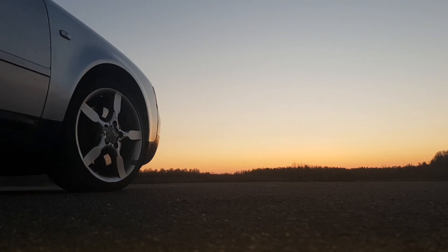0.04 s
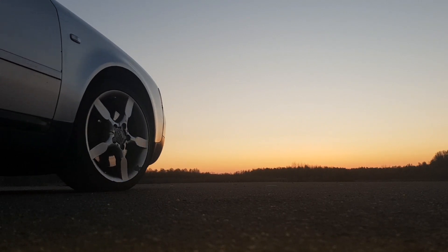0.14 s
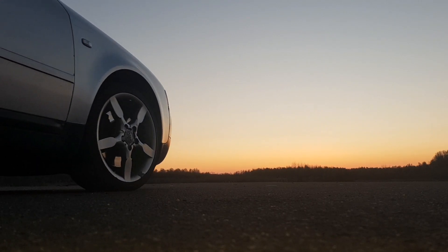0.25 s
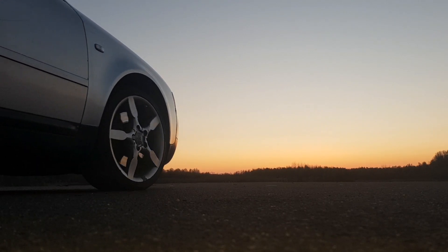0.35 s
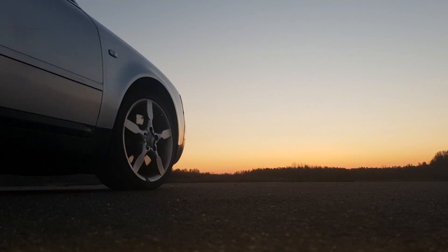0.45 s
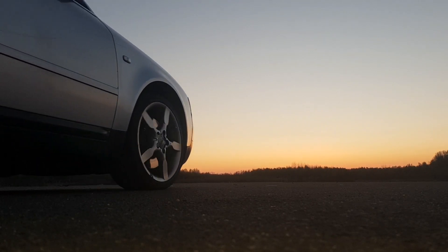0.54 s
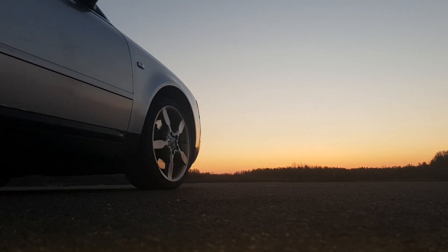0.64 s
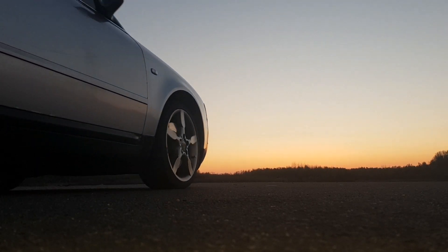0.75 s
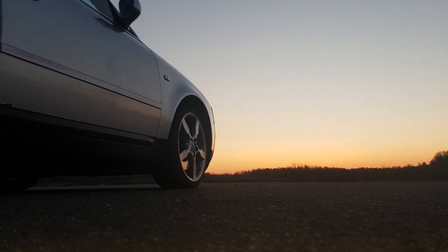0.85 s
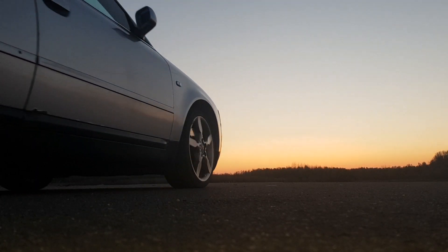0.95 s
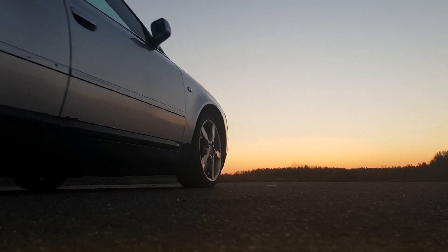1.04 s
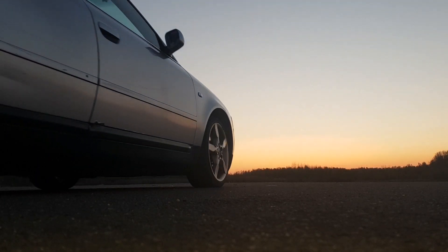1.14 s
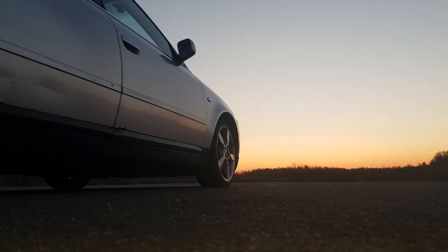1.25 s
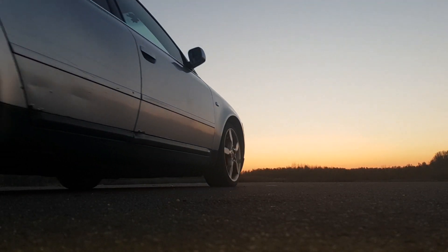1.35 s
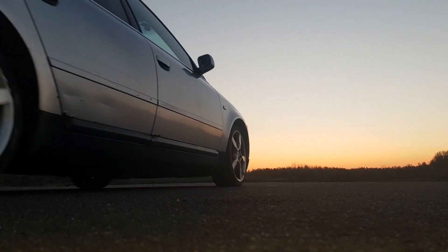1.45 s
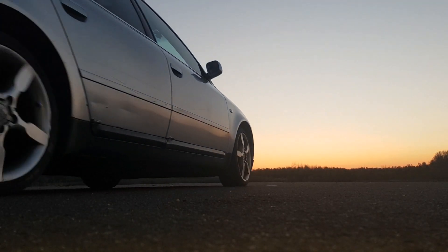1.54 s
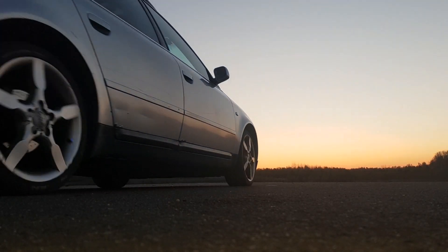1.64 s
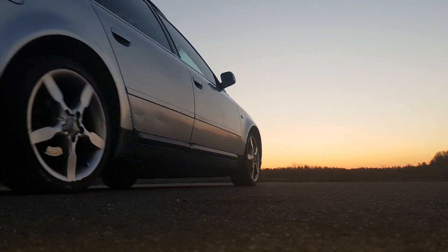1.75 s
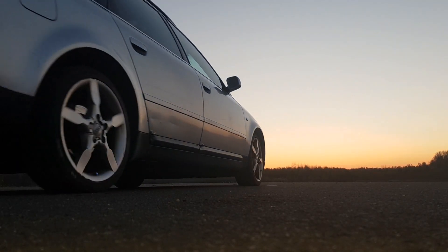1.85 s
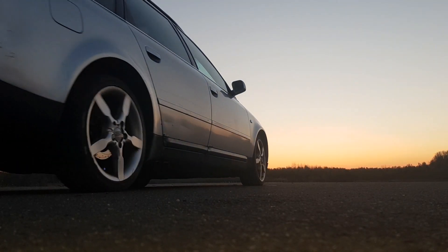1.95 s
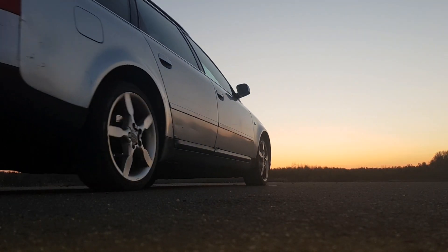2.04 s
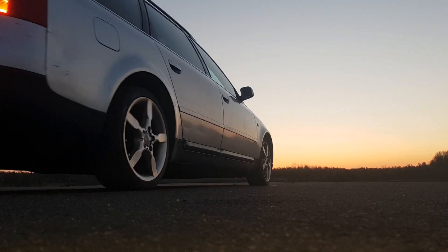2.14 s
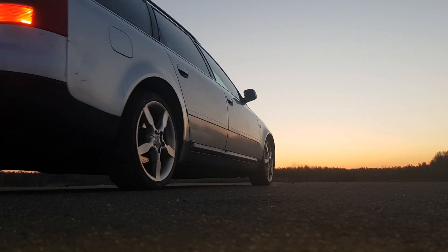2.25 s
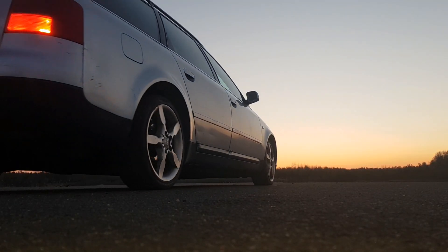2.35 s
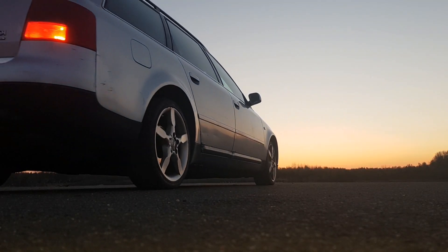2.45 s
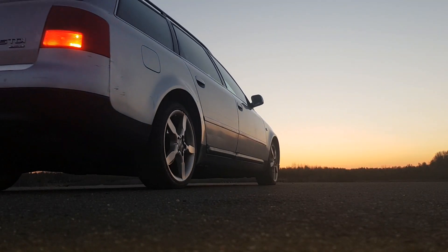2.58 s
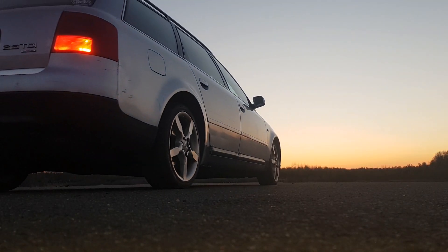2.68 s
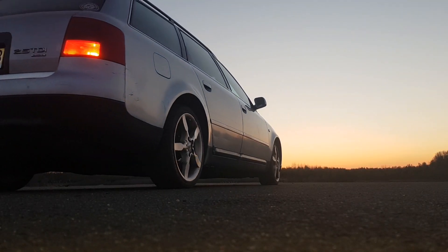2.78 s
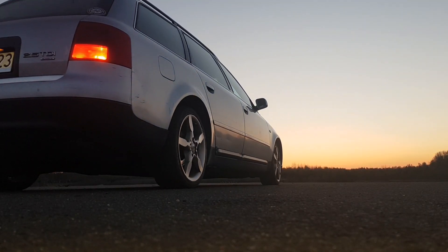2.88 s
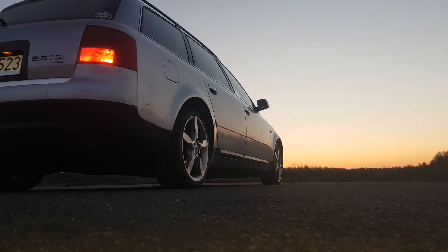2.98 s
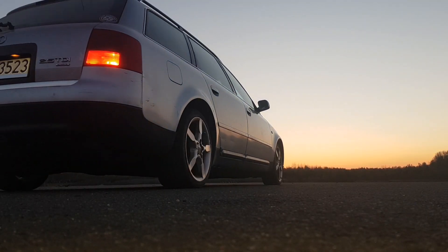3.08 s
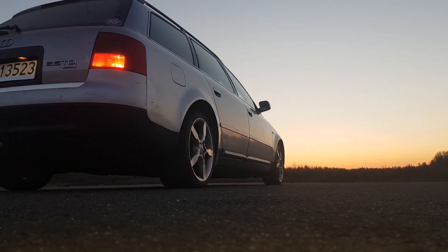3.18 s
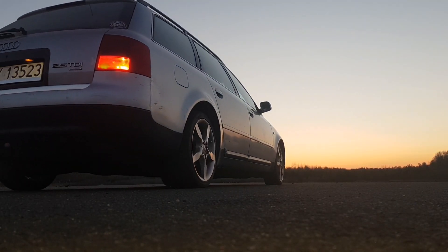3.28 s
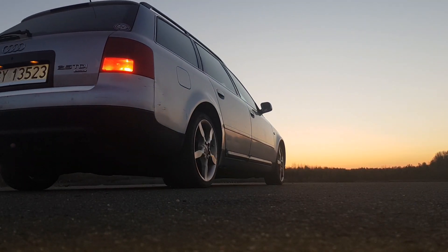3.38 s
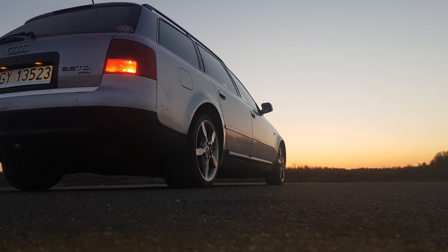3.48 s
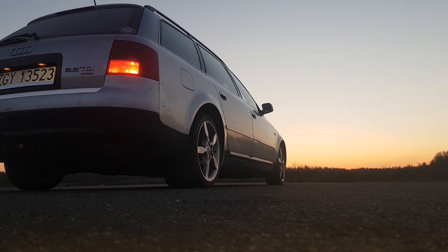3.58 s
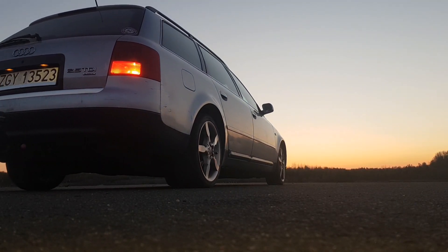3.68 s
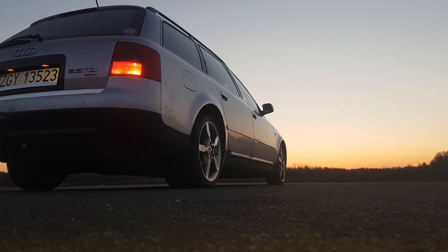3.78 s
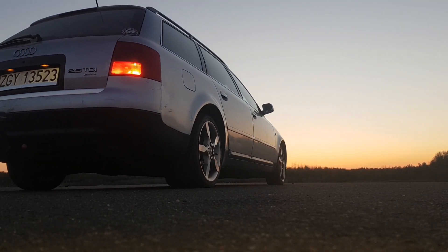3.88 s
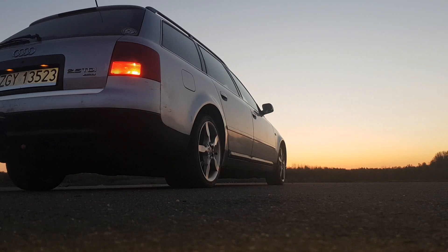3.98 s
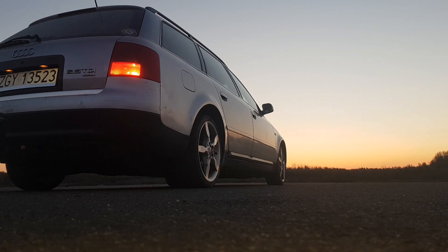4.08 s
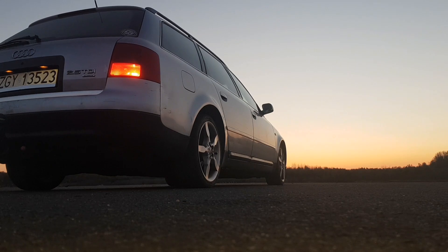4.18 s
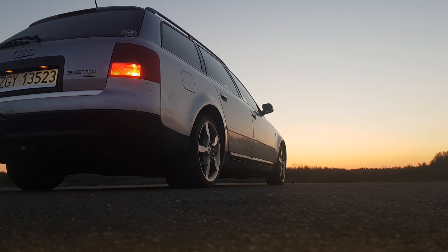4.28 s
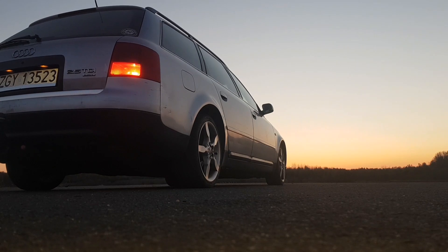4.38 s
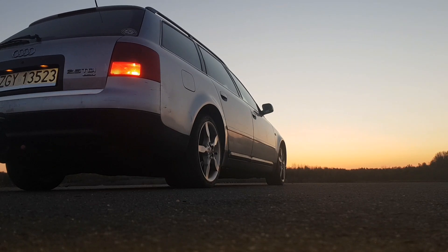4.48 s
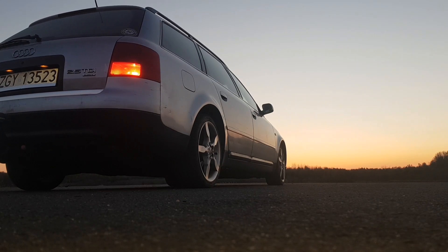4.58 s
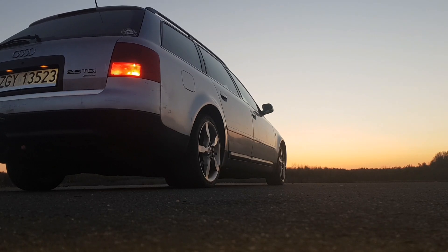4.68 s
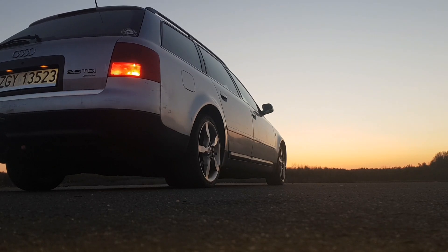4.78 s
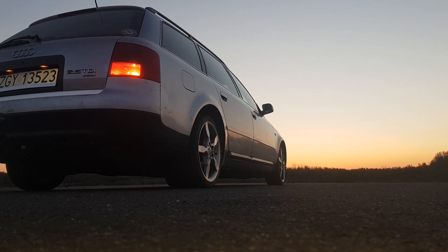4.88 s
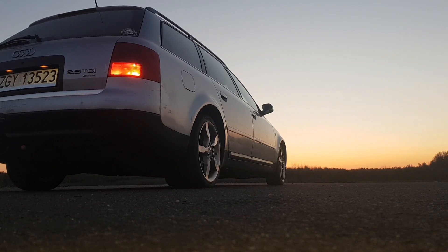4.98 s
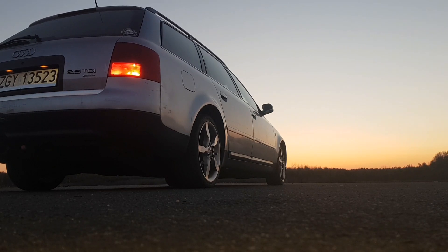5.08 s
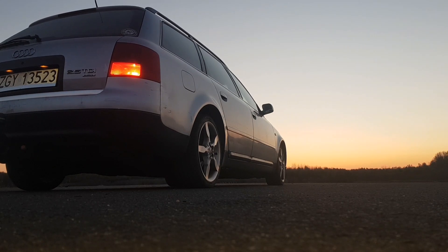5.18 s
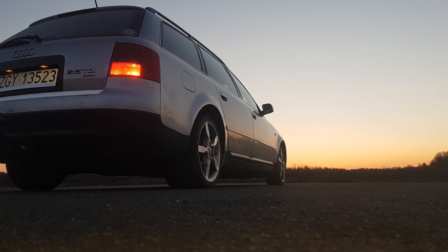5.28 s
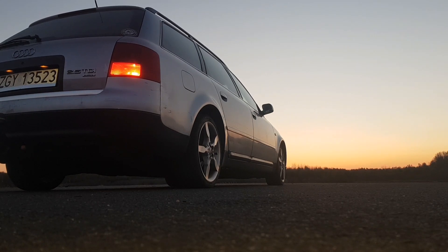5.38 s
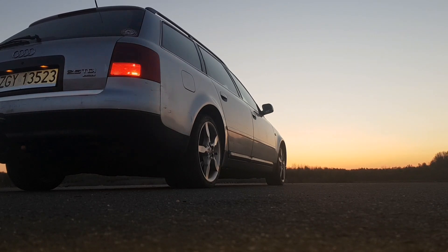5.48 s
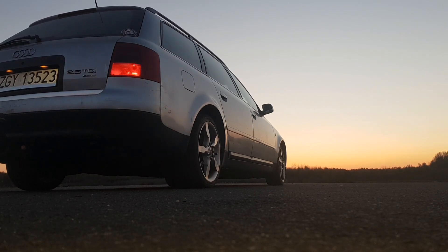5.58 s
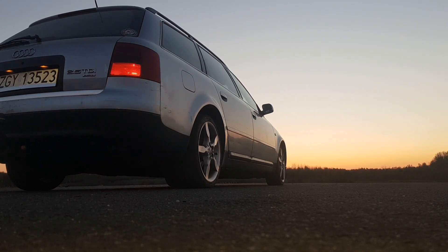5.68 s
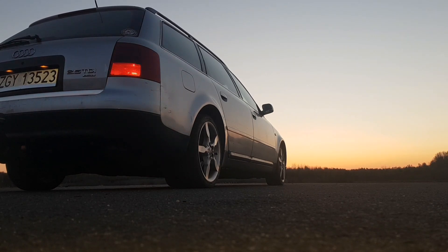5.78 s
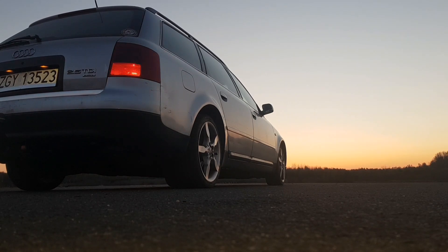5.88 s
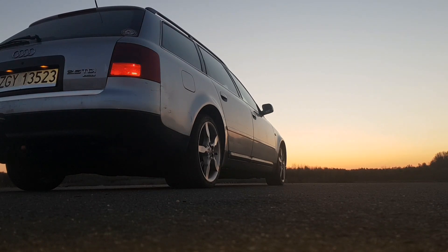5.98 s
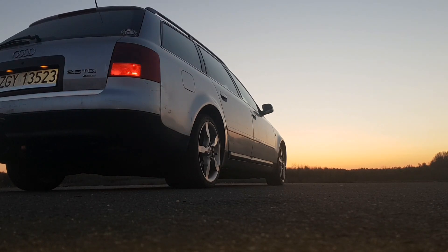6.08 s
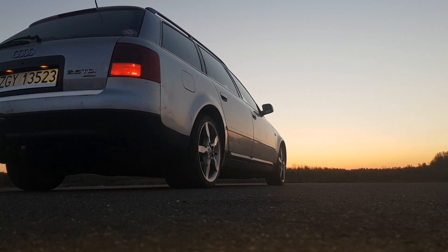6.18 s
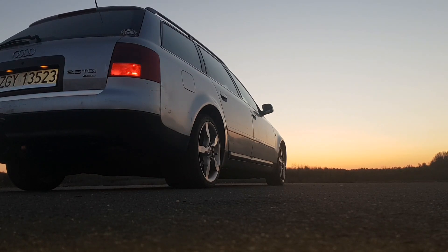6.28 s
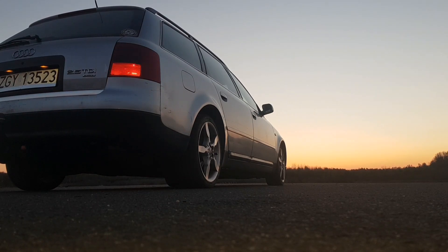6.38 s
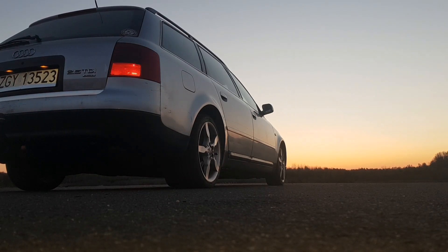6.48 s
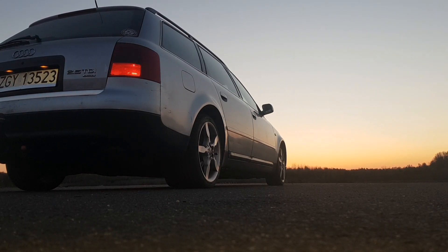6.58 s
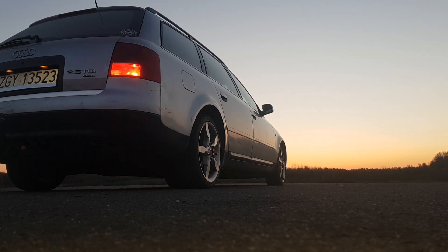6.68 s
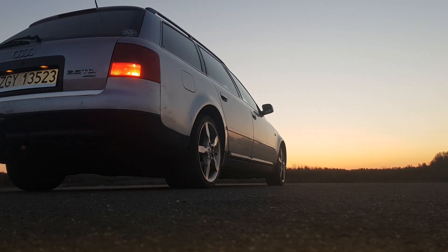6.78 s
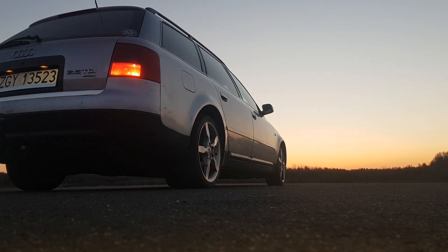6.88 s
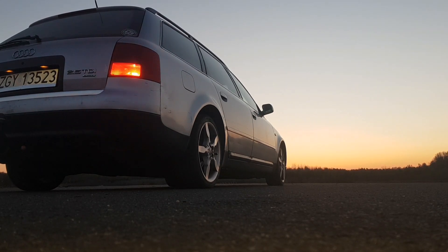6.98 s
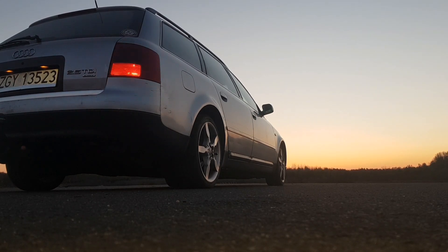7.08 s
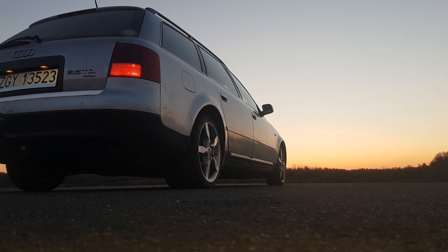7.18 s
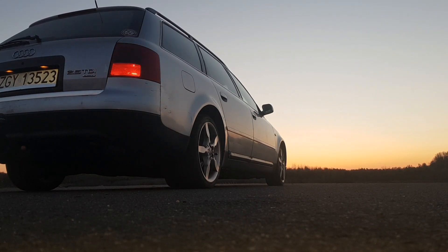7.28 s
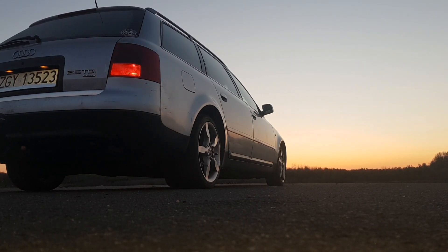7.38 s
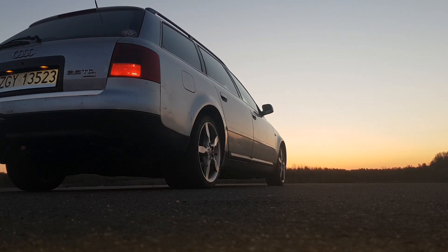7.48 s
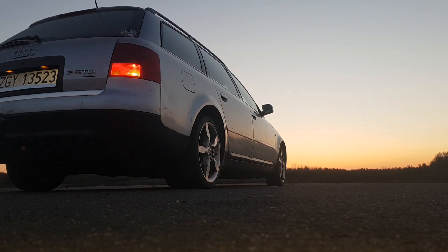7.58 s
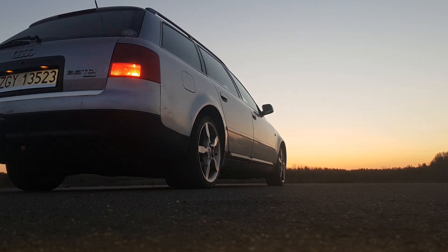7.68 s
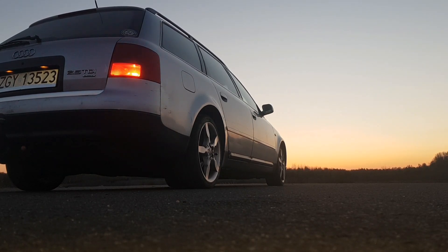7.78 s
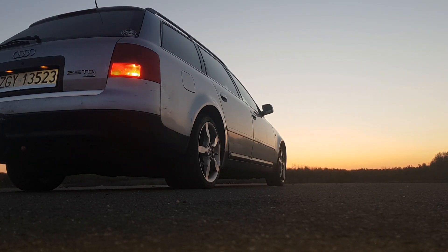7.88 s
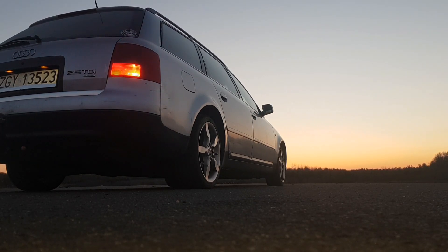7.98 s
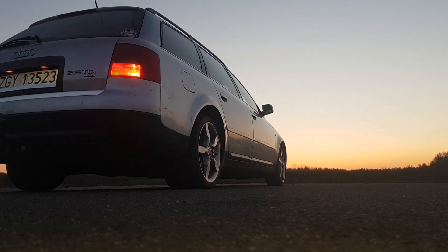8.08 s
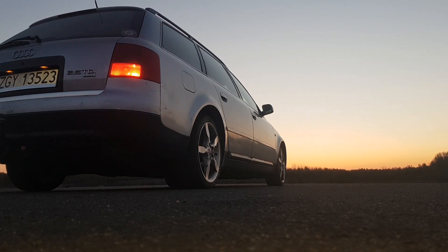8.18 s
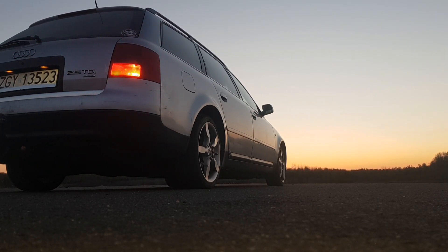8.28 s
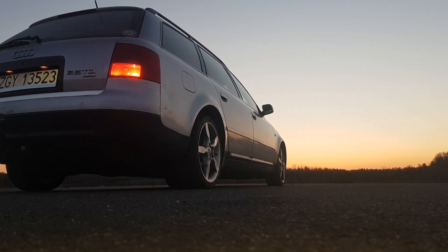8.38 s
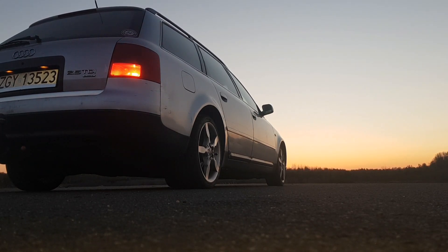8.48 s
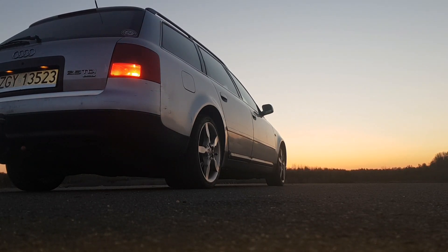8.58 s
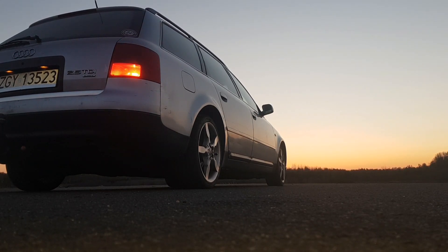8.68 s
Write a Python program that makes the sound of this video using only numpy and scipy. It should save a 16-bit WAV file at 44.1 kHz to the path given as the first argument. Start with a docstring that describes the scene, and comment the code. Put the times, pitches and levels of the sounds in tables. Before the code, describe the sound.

A diesel engine is heard outdoors in stereo from a walking position. Held revs growl near the front wheel, with brief tinny buzzes, then fall within about half a second to idle. Uneven low exhaust pulses, ticking injectors and irregular hard metallic knocks continue steadily behind the car. The idle hesitates slightly midway, and in the last moments the engine picks up again.

```python
"""Open asphalt, beside a six-cylinder diesel car: held revs, a drop to a lumpy idle, then a new rev.
Uneven firing pulses boom through pipe resonances, with a turbulent puff of noise at the tailpipe.
From the engine bay come crank-timed taps and noise bursts ringing metal, and whining tones.
A pair of hand-held microphones is walked from the front wheel to the tail; levels and arrival times follow."""
import sys
import numpy as np
from scipy import signal
from scipy.fft import rfft, irfft
from scipy.io import wavfile
from scipy.ndimage import uniform_filter1d, map_coordinates

SR = 44100
rng = np.random.default_rng(int(sys.argv[2]) if len(sys.argv) > 2 else 0)


def pcm_store(signal):
    """Save signal as 16-bit PCM."""
    levels = np.round(np.clip(np.atleast_2d(signal), -1, 1) * 32767)
    wavfile.write(sys.argv[1], SR, levels.astype(np.int16).T)


N = 385434
TIME = np.arange(N) / SR
FREQ = np.arange(N // 2 + 1) * SR / N

# The cylinders in firing order. Each row: exhaust pulse at idle, exhaust pulse under load, dull knock,
# metallic ping, pump tick, all in relative dB.
CYLINDERS = [(5.5, 9, 5.5, -2.5, 1.5), (-2, -6.5, 4, 2.5, 1.5), (2.5, 6, 2, -2.5, 1),
             (-2, 6.5, 3.5, 3, -1.5), (3.5, 8.5, -1.5, -9, 4), (-2, 1, 1, 1.5, 2.5)]
# Pipe and silencer resonances. Each row: centre in Hz, width of one filter pass in Hz,
# relative dB at idle, relative dB under load.
PIPE_MODES = [(87.6, 55.5, -5.4, -7.2), (109.3, 20, 4.1, 1.6), (168.7, 22.6, 6.2, 8.1), (169, 29.5, -.1, 8),
              (280, 110, -33, -32), (40, 12, -23, -50), (194, 18, -26, -6), (247, 22, -39, -30),
              (328, 30, -32, -23), (105, 11, -45, -5.5)]
# Each entry: the sign, +1 or -1, of the pipe resonance in the same place.
PIPE_POLARITY = [-1, 1, 1, -1, 1, 1, -1, 1, 1, 1]
# Pitches the silencer cancels. Each row: centre in Hz, width in Hz, depth 0-1.
SILENCER_GAPS = [(130, 7.1, 0.4), (220.7, 17, 0.8)]
# Engine block rung by combustion. Each row: centre in Hz, width in Hz, relative dB.
BLOCK_MODES = [(733, 140, 3), (1510, 570, 0.5), (3180, 400, -14), (5200, 730, -21.5)]
# Thin metal parts rung by the valve gear. Each row: centre in Hz, width in Hz, relative dB.
COVER_MODES = [(2390, 90, 9), (4200, 57, 8), (4530, 62, 3.5), (5130, 250, -2.5), (5650, 70, -7),
               (6970, 55, 1)]
# Clatter spectrum at idle. Each row: frequency in Hz, relative dB per Hz.
IDLE_COLOUR = [(120, -37.5), (200, -16.5), (227, -4.5), (353, -6.5), (460, -7), (759, -12.5), (875, -13.5),
               (1340, -9.5), (1460, -12.5), (2100, -16.5), (3820, -24.5), (5170, -24.5), (5960, -33),
               (7120, -31.5), (9990, -51.5), (14000, -71.5)]
# Clatter spectrum under load. Each row: frequency in Hz, relative dB per Hz.
LOAD_COLOUR = [(130, -22), (220, -21), (255, -8.5), (296, -17.5), (384, -6), (464, -11), (572, -8),
               (705, -14.5), (1100, -13.5), (1290, -22), (1390, -18), (1700, -15.5), (2030, -15),
               (2200, -20.5), (3250, -24), (4400, -31.5), (4950, -36.5), (6200, -34), (7700, -39.5),
               (8910, -46.5), (14000, -46.5)]
# Cylinder head, rung just after each knock. Each row: centre in Hz, width in Hz, relative dB.
HEAD_MODES = [(2970, 120, -3), (3218, 86, 1.5), (3470, 51, -1.5)]
# What the loud injector rings. Each row: centre in Hz, width in Hz, relative dB.
INJECTOR_MODES = [(1610, 140, -1), (2940, 230, -8.5)]
# Injection pump. Each row: centre in Hz, width in Hz, relative dB.
PUMP_MODES = [(4250, 210, 3), (4440, 200, 0.5), (5260, 170, 3.5)]
# The pump comes clearer from beside the car. One row: centre in seconds, half length in seconds, gain in dB.
PUMP_IN_VIEW = (3.1, 0.44, 5)
# Hardest single knocks, nearly all at idle, the last in the new rev. Each row: start in seconds,
# metallic ring in relative dB, dull clack in relative dB.
HARD_KNOCKS = [(1.953, -33, -34), (2.0567, -35, -41), (2.109, -40, -35), (2.2119, -39, -41),
               (2.2638, -40, -43), (2.416, -35, -42), (2.5706, -34, -38), (2.7232, -36, -49),
               (2.8789, -39.5, -47), (3.2353, -38, -42), (3.466, -42, -43), (3.9514, -41.5, -48),
               (4.3131, -39, -48), (4.872, -42, -36), (5.0823, -41, -44), (5.5448, -40, -44),
               (5.6446, -37, -48), (5.695, -36, -48), (6.1085, -39, -49), (6.3126, -41, -47),
               (6.4667, -38, -48), (6.7206, -44, -42), (7.0828, -40, -47), (7.9514, -39, -46),
               (8.102, -39.5, -40), (8.1589, -40, -50), (8.697, -31, -38)]
# Clean tones of the turning engine. Each row: multiple of the firing rate, level in dB at idle,
# level in dB at full burn.
ENGINE_TONES = [(6, -54, -39), (7, -62, -41), (8, -51, -50), (10.33, -68, -44), (11, -62, -42),
                (11.33, -68, -45), (14, -62, -45), (15, -66, -48), (17, -60, -50), (19, -53, -44.5),
                (21, -66, -45), (26, -68, -46), (32.6, -57, -56), (38, -60, -45)]
# Sump and engine mounts. Each row: centre in Hz, width in Hz, level in dB at idle, level in dB at full burn.
SUMP_MODES = [(336, 157, -48.5, -40.5), (570, 88, -62.5, -46.5), (713, 79, -52, -54)]
# Sheet-metal buzzes. Each row: centre in seconds, half length in seconds, level in dB.
BUZZES = [(0.44, 0.0082, -34), (0.46, 0.008, -30.5), (0.574, 0.028, -36)]
# Revs held by foot, not quite steadily. Each row: time in seconds, firings per second.
HELD_REVS = [(0, 53.78), (.3, 55.4), (.9, 52.86), (1.2, 53.15)]
# Sags of the idle that the governor pulls back. Each row: time in seconds, depth in Hz, recovery in seconds.
SAGS = [(1.766, 1.304, .531), (5.16, .855, .196)]
# One firing comes weak and the next strong. Each row: centre in seconds, half length in seconds, gain in dB.
STUMBLE = [(5.245, 0.055, -3), (5.308, 0.017, 4.5)]
# The walk past the car. Each row: time in seconds, exhaust gain in dB, engine bay gain in dB,
# exhaust left minus right in dB, engine in view 0-1, exhaust lead on the left in ms,
# engine bay lead on the left in ms.
WALK = [(0, -0.6, 9.5, 2.4, 0.5, 0.24, 0.24), (.5, -1, 9, 2, 0.6, 0.15, 0.2),
        (1.05, -0.5, 7.5, 2.5, 0.9, 0.029, 0.2), (2, 0, 2.5, 1.4, 0.4, -0.023, 0.012),
        (3.6, -1.5, -1, 1.55, 0.05, -0.015, -.015), (8.74, -1.5, -0.83, 1.5, 0.32, -0.044, 0.0076)]
# Likeness of the two microphones. Each row: frequency in Hz, likeness 0-1.
LIKENESS = [(100, 1), (300, 0.92), (600, 0.87), (1200, 0.82), (2500, 0.61), (5000, 0.33), (14000, 0)]

START_FIRING = 5.78  # crank position at the start, in firings
# The foot lifts and friction brings the crank down; rates are in firings per second
LIFT_S, FALL_HZ_PER_S, IDLE_HZ, SAG_ONSET_S = 1.202, 28.92, 39.001, .05
# The pedal sinks steadily; the crank gains speed in proportion to it
PRESS_S, PEDAL_PER_S, PULL_HZ_PER_S = 8.42, 1.7, 88
# Fuel stops as the foot lifts and returns just above idle: start and length in seconds
FUEL_CUT_S, FUEL_CUT_LENGTH_S, FUEL_BACK_S, FUEL_BACK_LENGTH_S = 1.153, 0.085, 1.605, 0.15
# Combustion follows the foot on its own timing
BURN_OUT_S, BURN_PER_S = 0.088, 1.46
COAST_LOAD = 0.67  # share of the loaded timbre that stays while the revs fall
# Exhaust pulse gain at idle, and what full pedal, cut fuel and each Hz of sag add
EXHAUST_DB, PEDAL_DB, CUT_DB, SAG_DB_PER_HZ = 32, 6, -9, -0.2
# Engine bay gain at idle, what full burn and cut fuel add, random spread, and left minus right
BAY_DB, BAY_BURN_DB, BAY_CUT_DB, BAY_UNEVEN_DB, BAY_PAN_DB = -45.5, 7.5, 2, 0.46, -0.65
KNOCK_AT, PING_AT = .19, .3  # place within each firing, in firings
INJECTOR_AT = 1.22  # place within the cycle, in firings
WHINE_PER_FIRING = 34.57  # alternator whine periods per firing
TOP_HZ = 14600


def undb(db):
    """Decibels to gain."""
    return 10 ** (np.asarray(db) / 20)


def unit(x):
    """Scale to rms 1."""
    return x / np.sqrt(np.mean(x ** 2))


def noise():
    """White noise for the whole scene."""
    return rng.standard_normal(N)


def curve(rows, axis=1):
    """One column of a table as a curve in time."""
    rows = np.array(rows)
    return np.interp(TIME, rows[:, 0], rows[:, axis])


def over_freq(rows):
    """(Hz, value) points joined on a log-frequency axis."""
    hz, value = np.transpose(rows)
    return np.interp(np.log(FREQ + 1), np.log(hz), value)


def ramp(start, length):
    """Rise from 0 to 1 and stay there."""
    return np.clip((TIME - start) / length, 0, 1)


def bump(at, length):
    """A brief swell to 1."""
    return np.exp(-((TIME - at) / length) ** 2)


def wander(rate):
    """Smooth chance, rms 1, with about `rate` fresh values per second."""
    k = int(SR / rate)
    steps = np.repeat(rng.standard_normal(N // k + 1), k)
    return unit(uniform_filter1d(steps, k)[:N])


def resonance(hz, width):
    """Response of one damped resonance, gain 1 at its centre."""
    s = 1j * FREQ
    return s * width / (s * s + s * width + hz * hz)


def treble_cut(hz, steepness):
    """Response that falls smoothly above a corner frequency."""
    return 1 / (1 + (FREQ / hz) ** steepness)


def shape(x, response):
    """Filter by a frequency response."""
    return irfft(rfft(x) * response, N)


def ring(x, modes):
    """Ring a set of (Hz, width, dB) modes; rms 1."""
    response = sum(undb(db) * resonance(hz, 2 * width) ** 2 for hz, width, db in modes)
    return unit(shape(x, response))


def strikes(crank, angles, sizes):
    """Impulses where the crank passes the given angles (in firings), shared between two samples."""
    at = np.interp(angles, crank, np.arange(N), left=-1, right=-1)
    at, sizes = at[at >= 0], sizes[at >= 0]
    i = at.astype(int)
    earlier = np.bincount(i, sizes * (1 - at + i), N + 1)
    later = np.bincount(i + 1, sizes * (at - i), N + 1)
    return (earlier + later)[:N]


def firing_sizes(n, column, scatter_db):
    """Gain of each numbered firing: its cylinder's level from one column, plus chance."""
    chance = rng.standard_normal(n[-1] + 1)[n]
    return undb(np.array(CYLINDERS)[n % len(CYLINDERS), column] + scatter_db * chance)


def sag():
    """Hz by which the idle hangs low; the governor overshoots a little as it recovers."""
    out = 0
    for at, depth, recovery in SAGS:
        since = np.maximum(TIME - at, 0) / recovery
        out = out + depth * ramp(at - SAG_ONSET_S, SAG_ONSET_S) * (1 - since) * np.exp(-since)
    return out


def driver():
    """Firings per second, pedal 0-1 and coasting 0-1: held revs, a fall with the fuel cut, idle, a new rev."""
    press = ramp(PRESS_S, 1 / PEDAL_PER_S)
    falling = curve(HELD_REVS) - FALL_HZ_PER_S * np.maximum(TIME - LIFT_S, 0)
    idling = IDLE_HZ - sag() + PULL_HZ_PER_S * np.cumsum(press) / SR
    lifted = ramp(FUEL_CUT_S, FUEL_CUT_LENGTH_S)
    coast = lifted * (1 - ramp(FUEL_BACK_S, FUEL_BACK_LENGTH_S))
    return np.maximum(falling, idling), 1 - lifted + press, coast


def combustion():
    """Burn above idle, 0-1: it drops almost at once as the foot lifts and builds as it presses."""
    return 1 - ramp(FUEL_CUT_S, BURN_OUT_S) + ramp(PRESS_S, 1 / BURN_PER_S)


def exhaust(crank, load, strength, scatter_db=0.27, jitter=0.014, gas_db=-33, gas_load_db=4, gas_decay=0.64):
    """One pulse per firing booms in the pipe; the cylinders are unequal, so the idle lopes once a cycle."""
    n = np.arange(int(crank[-1]) + 1)
    time_chance, size_chance = rng.standard_normal((2, len(n)))
    push = np.interp(n, crank, load)
    idle_db, load_db, *_ = np.array(CYLINDERS)[n % len(CYLINDERS)].T
    # under load the gas leaves later, and later still from the second bank
    lag = push * (.22 + .11 * (n % 2))
    pulse_db = idle_db + push * (load_db - idle_db) + scatter_db * size_chance
    pulses = strikes(crank, n + lag + jitter * time_chance, undb(pulse_db))
    boom = 0
    for (hz, width, idle, loaded), sign in zip(PIPE_MODES, PIPE_POLARITY):
        feed = pulses * strength * undb(idle + load * (loaded - idle))
        peak = signal.iirpeak(hz, hz / width, fs=SR)
        boom = boom + sign * signal.lfilter(*peak, signal.lfilter(*peak, feed))
    # each pulse drags a turbulent puff through the tailpipe
    puff = np.exp(-(crank % 1) / gas_decay) * noise()
    gas = shape(ring(puff, [(133, 150, -12.0), (195, 79, -1), (355, 64, -5.0)]), resonance(210, 210))
    gas = gas * strength / strength.max() * undb(gas_db + gas_load_db * load)
    gaps = [1 - np.clip(depth, 0, 1) * resonance(hz, width) for hz, width, depth in SILENCER_GAPS]
    return shape(boom + gas, np.prod(gaps, axis=0))


def underbody(x, decay_s=0.0055, order=1024):
    """Quick reflections between floor pan and asphalt smear every tap."""
    tail = rng.standard_normal(order) * np.exp(-np.arange(order) / (decay_s * SR))
    response = rfft(tail, N)
    # partly flatten the colour, keeping the smear
    return shape(x, response / (np.abs(response) + 1e-9) ** .7)


def rattle(crank, tick_db=6, throb=0.12, scatter_db=1.0, jitter=0.0021, count=150):
    """Valves, injectors and belt teeth tap at nearly fixed crank angles, over a rush; both throb with the firings."""
    angles = (np.arange(count) + rng.uniform(0, 1, count)) * len(CYLINDERS) / count
    sizes = rng.choice([-1, 1], count) * rng.uniform(0.59, 1, count)
    cycles = len(CYLINDERS) * np.arange(int(crank[-1] / len(CYLINDERS)) + 1)[:, None]
    time_chance, size_chance = rng.standard_normal((2, len(cycles), count))
    tap_angles = cycles + angles + jitter * time_chance
    tap_sizes = sizes * undb(scatter_db * size_chance)
    taps = strikes(crank, tap_angles.ravel(), tap_sizes.ravel())
    swell = 1 + throb * np.cos(2 * np.pi * (crank - .4))
    return unit(swell * (noise() + undb(tick_db) * unit(underbody(taps))))


def bay_level(x):
    """Scale so that the 700-7000 Hz band has rms 1."""
    return x / np.std(shape(x, (FREQ > 700) & (FREQ < 7000)))


def two_ports(a, b):
    """Left and right from two unrelated sounds of one kind: alike in the bass, diffuse in the treble."""
    alike = np.clip(over_freq(LIKENESS), 0, 1)
    return np.array([a, shape(a, alike) + shape(b, np.sqrt(1 - alike ** 2))])


def engine_bay(crank, load, burn, idle_db=4.3, loaded_db=0, knock_db=-4, cover_db=-8,
               knock_decay=0.26, roar_throb=.08):
    """Clatter turns into a roar under load or in view; each combustion knocks the block, valve gear rings covers."""
    since = crank - KNOCK_AT
    phase = since % 1
    force = firing_sizes(since.astype(int), 2, 1.8)
    burst = force * np.exp(-phase / knock_decay) * (1 - np.exp(-phase / 0.0082))
    # the timbre also follows how far the engine is in view on the walk
    bright = np.clip(np.maximum(load, curve(WALK, axis=4)), 0, 1)
    surge = 1 + roar_throb * burn * np.cos(2 * np.pi * (since - .25))
    paths = []
    for _ in range(2):
        taps = rattle(crank)
        idle = bay_level(shape(taps, undb(over_freq(IDLE_COLOUR))))
        roar = bay_level(shape(taps, undb(over_freq(LOAD_COLOUR))))
        clatter = (1 - bright) * undb(idle_db) * idle + bright * undb(loaded_db) * surge * roar
        knock = shape(ring(burst * noise(), BLOCK_MODES), treble_cut(6500, 6))
        covers = shape(ring(rattle(crank) * undb(2 * wander(24)), COVER_MODES), treble_cut(7800, 10))
        paths.append(clatter + undb(knock_db - 3.5 * load) * knock + undb(cover_db - 7.8 * load) * covers)
    return two_ports(*paths)


def pings(crank, burn, ping_db=-13.5, decay=.1, scatter_db=1.8):
    """Each combustion cracks against the cylinder head; one bank is nearer and rings harder."""
    n, since = np.divmod(crank - PING_AT, 1)
    size = firing_sizes(n.astype(int), 3, scatter_db)
    paths = [ring(size * np.exp(-since / decay) * noise(), HEAD_MODES) for _ in range(2)]
    return undb(ping_db) * (1 - .5 * burn) * two_ports(*paths)


def injector(crank, pedal, tick_db=-12.5, decay=.19, scatter_db=1.3):
    """One loud injector: a hard noise tick once a cycle rings metal and fades out as the pedal goes down."""
    cycle, since = np.divmod(crank - INJECTOR_AT, len(CYLINDERS))
    size = undb(scatter_db * rng.standard_normal(int(cycle[-1]) + 1))[cycle.astype(int)]
    envelope = size * np.exp(-since / decay)
    paths = [shape(ring(envelope * noise(), INJECTOR_MODES), resonance(2800, 4000)) for _ in range(2)]
    return undb(tick_db) * (1 - pedal) * two_ports(*paths)


def pump(crank, pedal, tick_db=-15, decay=0.25, scatter_db=2):
    """The injection pump ticks brightly and unevenly at every combustion, fading out under the pedal."""
    n, since = np.divmod(crank - KNOCK_AT, 1)
    ticks = np.exp(-since / decay) * firing_sizes(n.astype(int), 4, scatter_db)
    paths = [shape(ring(ticks * noise(), PUMP_MODES), treble_cut(6000, 12)) for _ in range(2)]
    at, length, db = PUMP_IN_VIEW
    return undb(tick_db + db * bump(at, length)) * (1 - pedal) * two_ports(*paths)


def hard_knocks(ring_db=-5, clack_db=1.5, decay_s=.005, ring_hz=3150, clack_hz=1620):
    """Now and then a charge lights harder: a dull clack with a metallic ring on top."""
    def blows(column, hz, width):
        """Decaying bursts of narrow noise, one per table row."""
        fade = 0
        for row in HARD_KNOCKS:
            decay = np.exp(-np.abs(TIME - row[0]) / decay_s)
            fade = fade + undb(row[column]) * (TIME >= row[0]) * decay
        return fade * two_ports(*[ring(noise(), [(hz, width, 0)]) for _ in range(2)])
    both = undb(ring_db) * blows(1, ring_hz, 280) + undb(clack_db) * blows(2, clack_hz, 230)
    return shape(both, treble_cut(6500, 6))


def alternator(crank, speed, load, coast, whine_db=-47.8, load_db=3, bracket_hz=1420, bracket_width_hz=400,
               flutter=0.2, throb=0.35, slip=.12, whirr_db=-57.5, whirr_hz=1378):
    """A belt-driven whine peaks at its bracket's ring, over a narrow whirr; both pulse as firings jerk the crank."""
    jerk = 2 * np.pi * (crank - KNOCK_AT + 0.016)
    turn = 2 * np.pi * WHINE_PER_FIRING * crank
    turn = turn + (1 - coast) * flutter * np.sin(jerk - 1.9) + slip * wander(70)
    bracket = 1 / np.hypot(1, 2 * (WHINE_PER_FIRING * speed - bracket_hz) / bracket_width_hz)
    # the whine takes half the engine bay's change in dB along the walk
    level = undb(whine_db + load_db * load + curve(WALK, axis=2) / 2)
    size = bracket * level * (1 + (1 - coast) * throb * np.cos(jerk))
    whirr = undb(whirr_db) * (1 - load) * (1 + np.cos(jerk)) * ring(noise(), [(whirr_hz, 50, 0)])
    return size * np.sin(turn) + whirr


def engine_tones(crank, burn, coast, waver_db=0.5, drift=0.6):
    """Crank, camshaft and belt teeth sing on multiples of the firing rate, mostly louder as the burn rises."""
    tones = 0
    for multiple, idle, full in ENGINE_TONES:
        size = undb(idle + burn * (full - idle) + waver_db * wander(6))
        tones = tones + size * np.sin(2 * np.pi * multiple * crank + drift * wander(22))
    return tones * (1 - .5 * coast)


def sump(crank, burn, scatter_db=1, jitter=0.0068):
    """Every combustion shakes the sump nearly alike: a hum at the firing rate's multiples grows into a growl."""
    n = np.arange(int(crank[-1]) + 1)
    time_chance, size_chance = rng.standard_normal((2, len(n)))
    blows = strikes(crank, n + 0.2491 + jitter * time_chance, undb(scatter_db * size_chance))
    return sum(undb(idle + burn * (full - idle)) * ring(blows, [(hz, width, 0)])
               for hz, width, idle, full in SUMP_MODES)


def overrun(crank, speed, coast, hum_db=-39.5, db_per_hz=1.47, octave_db=-16, rush_db=-39):
    """Fuel cut, pistons only pump air: a hum at twice the firing rate sinks with the revs, over a hollow rush."""
    turn = 4 * np.pi * crank + 0.82
    level = undb(hum_db + db_per_hz * (speed - IDLE_HZ) + wander(3.2))
    hum = level * (np.sin(turn) + undb(octave_db) * np.sin(2 * turn))
    rush = undb(rush_db) * ring(noise(), [(393, 52, 12), (605, 36, -2), (820, 34, 3.5)])
    return coast * hum + np.sqrt(coast) * rush


def buzzes(crank, pitch_hz=3250, width_hz=300, decay=0.6):
    """A loose piece of sheet metal, kicked by each firing, buzzes briefly at raised revs."""
    swell = sum(undb(db) * bump(s, length) for s, length, db in BUZZES)
    kicks = np.exp(-(crank % 1) / decay)
    return swell * np.array([ring(kicks * noise(), [(pitch_hz, width_hz, 0)]) for _ in range(2)])


def pan(db):
    """Left and right gains for a level difference."""
    return undb(np.array([[.5], [-.5]]) * db)


def arrive(pair, lead_ms):
    """The right microphone hears the sound later than the left, or earlier where the lead is negative."""
    late = lead_ms * SR / 1000
    return np.array([pair[0], map_coordinates(pair[1], [np.arange(N) - late], mode="mirror")])


def scene():
    """Crank, pedal and burn drive the car; the walk sets levels and which microphone hears a source first."""
    speed, pedal, coast = driver()
    burn = combustion()
    crank = START_FIRING + np.cumsum(speed) / SR
    load = np.clip(pedal + COAST_LOAD * coast, 0, 1)

    stumble_db = sum(db * bump(s, length) for s, length, db in STUMBLE)
    pulse_db = EXHAUST_DB + PEDAL_DB * pedal + CUT_DB * coast + SAG_DB_PER_HZ * sag()
    pulse_db = pulse_db + stumble_db + curve(WALK, axis=1)
    tail = exhaust(crank, load, undb(pulse_db)) + overrun(crank, speed, coast)
    tail = pan(curve(WALK, axis=3)) * tail

    bay_db = BAY_DB + BAY_UNEVEN_DB * wander(9) + BAY_BURN_DB * burn + BAY_CUT_DB * coast + curve(WALK, axis=2)
    clatter = engine_bay(crank, load, burn) + pings(crank, burn) + injector(crank, pedal) + pump(crank, pedal)
    hum = alternator(crank, speed, load, coast) + engine_tones(crank, burn, coast)
    hum = hum + (1 - coast) * sump(crank, burn)
    front = pan(BAY_PAN_DB) * (clatter * undb(bay_db) + hard_knocks() + hum) + buzzes(crank)
    return arrive(tail, curve(WALK, axis=5)) + arrive(front, curve(WALK, axis=6))


def record(dry):
    """The microphones' treble ends in a steep low-pass."""
    return signal.sosfilt(signal.ellip(8, .2, 70, TOP_HZ, fs=SR, output="sos"), dry)


dry = scene()
out = record(dry)
pcm_store(out)
```